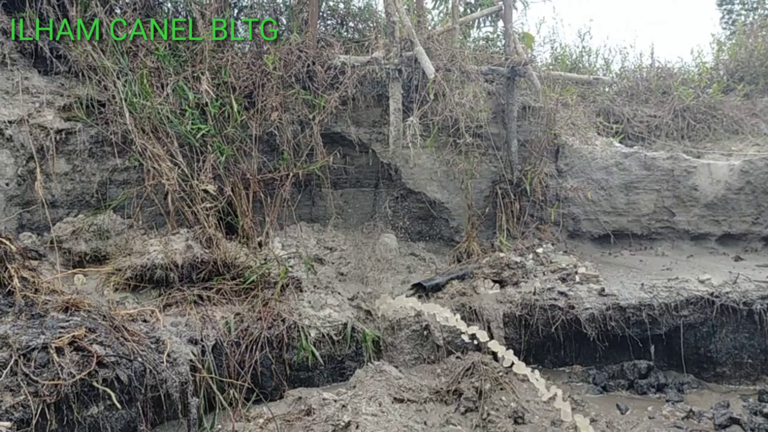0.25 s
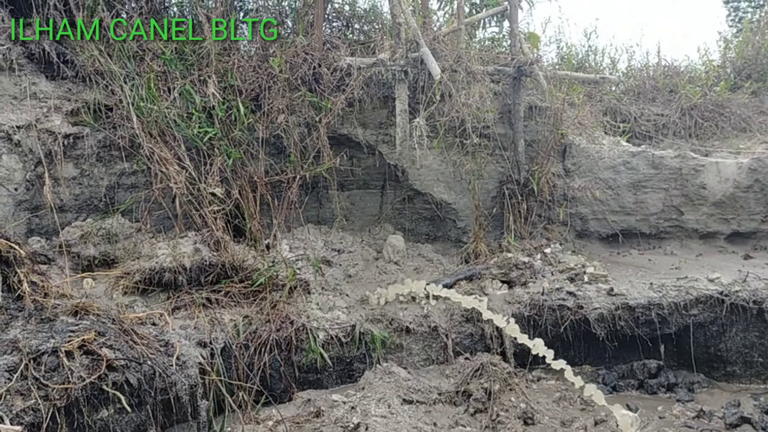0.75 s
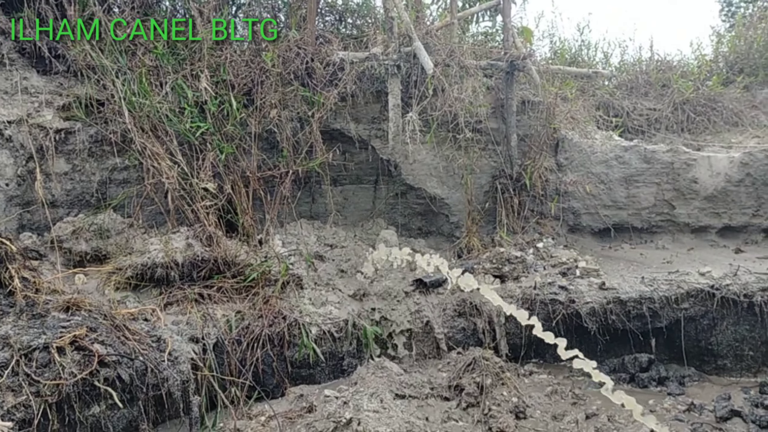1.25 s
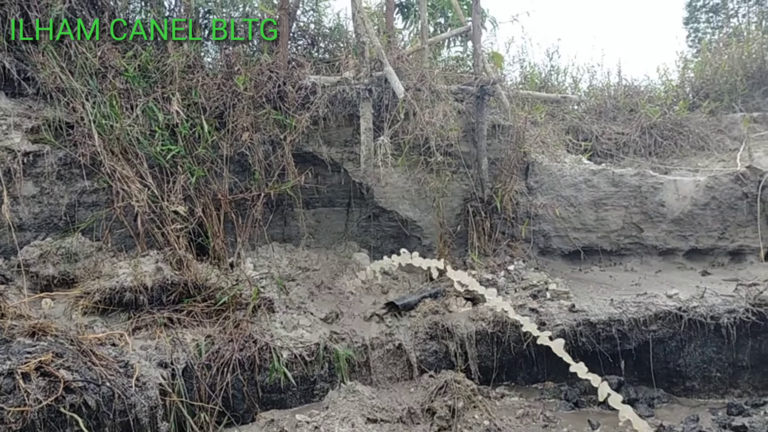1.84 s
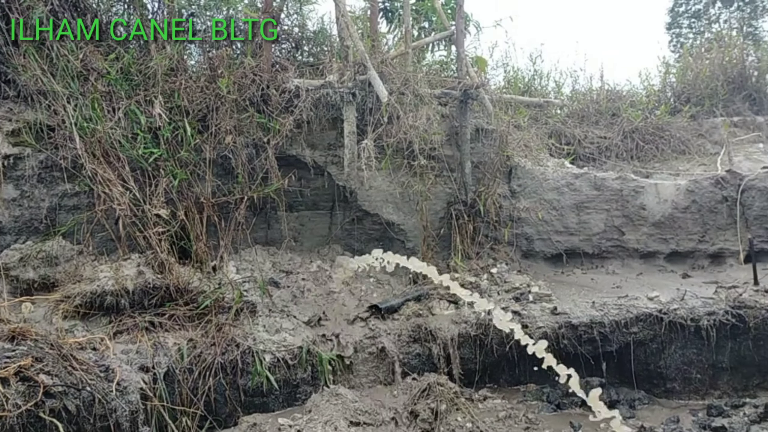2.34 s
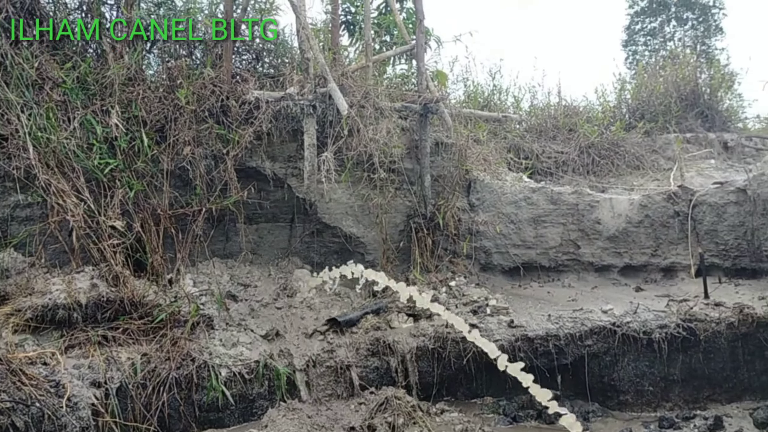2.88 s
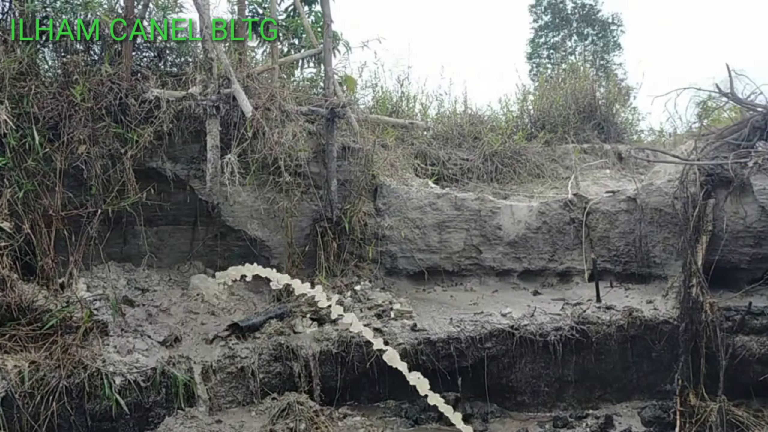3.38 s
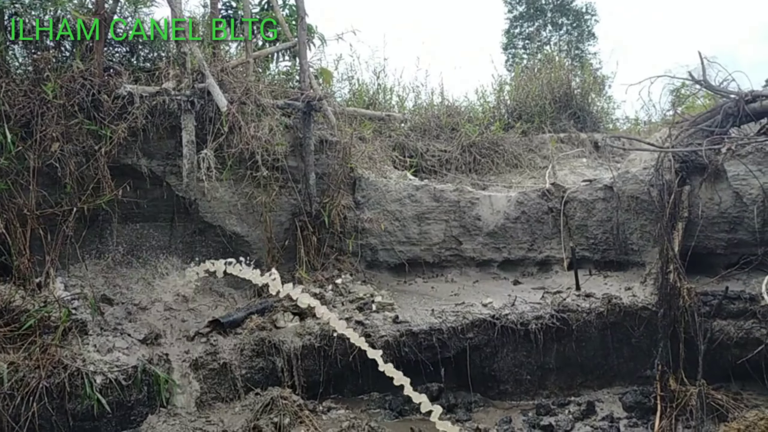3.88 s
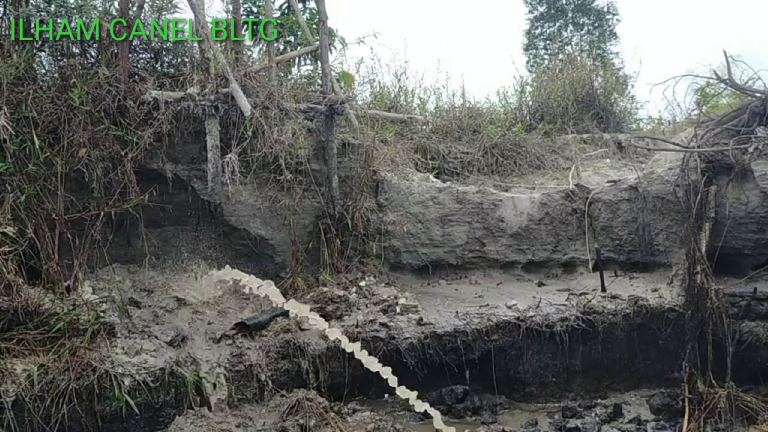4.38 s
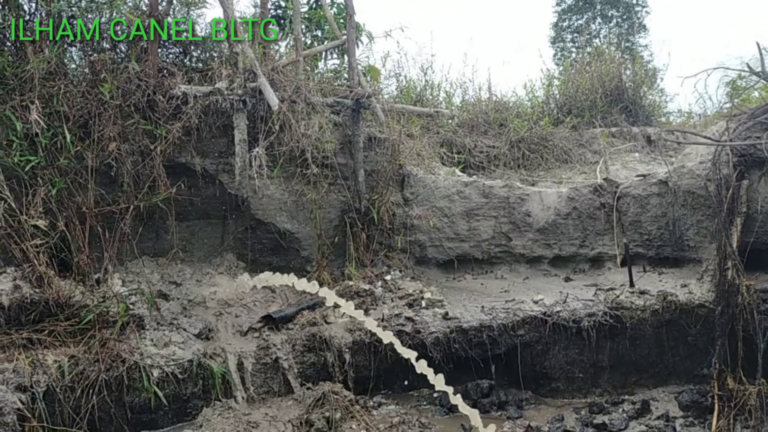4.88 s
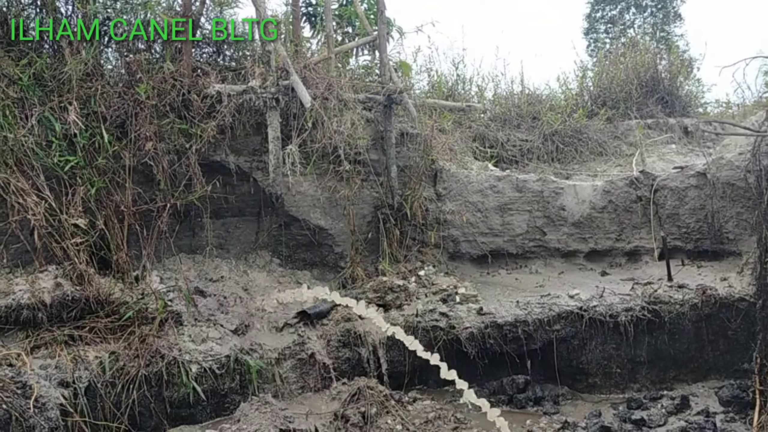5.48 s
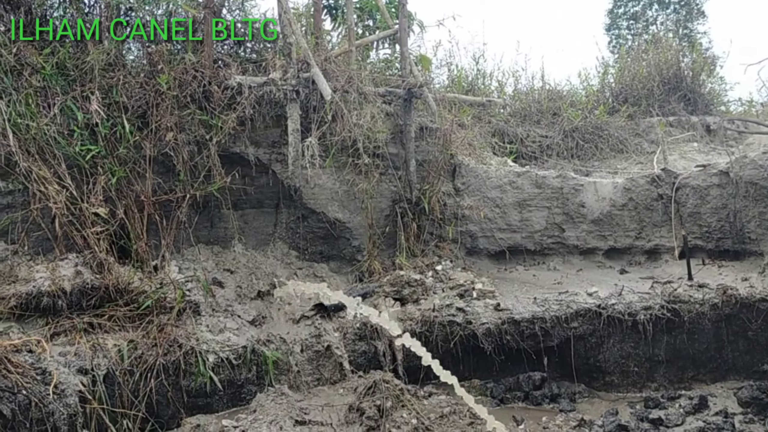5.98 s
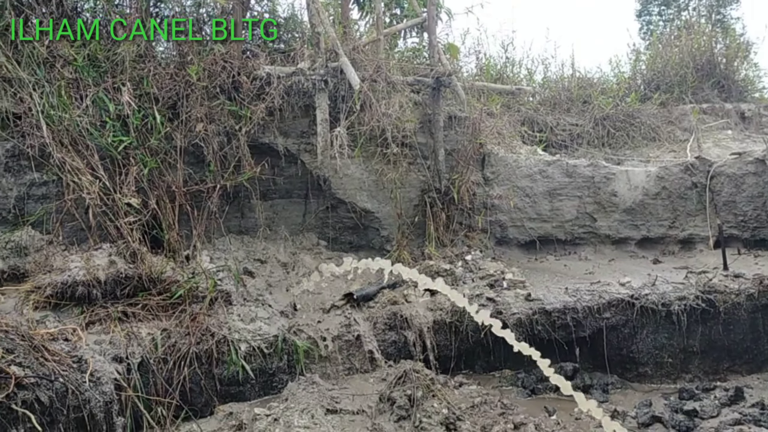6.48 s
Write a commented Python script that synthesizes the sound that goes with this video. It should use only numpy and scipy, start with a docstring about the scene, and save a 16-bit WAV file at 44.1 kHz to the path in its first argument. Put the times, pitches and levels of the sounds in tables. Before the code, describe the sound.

A lumpy jet of sandy slurry pours close by onto wet sand, slapping, gurgling and spattering, while a distant pump engine thuds steadily beneath.

```python
"""A lumpy jet of sandy slurry arcs, close by, from a pipe onto wet sand in an open pit.
The jet is random contacts and damped bubble sines, coloured by resonances of trapped air; slugs slap and plop.
Drops patter, spatter and fizz as filtered clicks; large bubbles gulp on rising sines; low rumbles thump.
Some way off, a pump's slow single-cylinder engine thuds steadily as harmonics of its firing rate and puffs
of noise, over the soft noise of the open air. One microphone, mono."""
import sys
import numpy as np
from scipy import signal
from scipy.fft import rfft, irfft, next_fast_len
from scipy.io import wavfile
from scipy.ndimage import uniform_filter1d

SR = 44100
rng = np.random.default_rng(int(sys.argv[2]) if len(sys.argv) > 2 else 0)


def transcribe(signal):
    """Save signal, clipped to [-1, 1], as a 16-bit WAV file at the path in sys.argv[1]."""
    frames = np.atleast_2d(signal).T
    limited = np.clip(frames, -1, 1)
    pcm = np.round(limited * 32767).astype(np.int16)
    wavfile.write(sys.argv[1], SR, pcm)


N = 296925   # length [samples]


def from_db(db):
    """Decibels to gain."""
    return 10 ** (np.asarray(db) / 20)


def rms_one(x):
    """Scale to unit rms."""
    return x / np.sqrt(np.mean(x ** 2) + 1e-20)


def in_time(rows):
    """The columns of a curve table, one value a sample."""
    s, *columns = np.transpose(rows)
    return [np.interp(np.arange(N) / SR, s, c) for c in columns]


def drift(rate_hz):
    """Slow random wander of rms 1: noise through two equal poles, computed every 40 samples."""
    step = 40
    r = np.exp(-2 * np.pi * rate_hz * step / SR)
    noise = rng.standard_normal(N // step + 2002)
    slow = signal.lfilter([1], [1, -2 * r, r * r], noise)[2000:]   # drop the filter's start
    return np.interp(np.arange(N) / step, np.arange(len(slow)), rms_one(slow))


def surge(depth_db, rate_hz):
    """The uneven delivery of the pipe, as a gain around 1."""
    return from_db(depth_db * drift(rate_hz))


def colour(x, spectrum):
    """Causal (minimum-phase) filter with the given spectrum; rms 1."""
    size = 2 * next_fast_len(N // 2 + SR // 10)
    hz, db = np.transpose(spectrum)
    bins_hz = np.fft.rfftfreq(size, 1 / SR)
    gain = from_db(np.interp(np.log(bins_hz + 1), np.log(hz), db))
    # folding the cepstrum onto positive time makes the phase minimal
    cepstrum = irfft(np.log(gain))[:size // 2]
    cepstrum[1:] *= 2
    response = np.exp(rfft(cepstrum, size))
    return rms_one(irfft(rfft(x, size) * response)[:N])


def skirted(spectrum):
    """Let a spectrum fall away over an octave beyond both ends."""
    (low, low_db), (high, high_db) = spectrum[0], spectrum[-1]
    return [(low / 2, low_db - 32.5), *spectrum, (high * 2, high_db - 30.0)]


def resonate(x, hz, width_hz):
    """One resonance with about unit gain at its top."""
    r = np.exp(-np.pi * width_hz / SR)
    top = np.array([1, 0, -1]) * (1 - r * r) / 2
    return signal.lfilter(top, [1, -2 * r * np.cos(2 * np.pi * hz / SR), r * r], x)


def moving_resonance(x, hz, width_hz):
    """A resonance whose centre follows a curve: shift down, smooth, shift back; rms 1."""
    spin = np.exp(2j * np.pi * np.cumsum(hz) / SR)
    smooth = signal.lfilter([1], [1, -np.exp(-np.pi * width_hz / SR)], x / spin)
    return rms_one((smooth * spin).real)


def band(x, low_hz, high_hz):
    """Keep what lies between two frequencies."""
    return signal.sosfilt(signal.butter(2, [low_hz, high_hz], "band", fs=SR, output="sos"), x)


def impacts(per_s, spread_db):
    """Random clicks of both signs; the rarer ones are larger, or smaller if spread_db is negative."""
    sizes = from_db(spread_db * np.minimum(rng.exponential(1, N), 4))
    return (rng.random(N) < per_s / SR) * sizes * rng.choice([-1, 1], N)


def held(x):
    """Smoothly even out the power over some hundredths of a second, keeping the fast grain."""
    power = uniform_filter1d(uniform_filter1d(x * x, size=SR // 20), size=SR // 20)
    return x / np.sqrt(np.abs(power) + 1e-12)


def lumps(per_s, decay_s, between):
    """The jet breaks into lumps: each lands at once and drains away over a floor of power between them."""
    hits = np.abs(impacts(per_s, spread_db=0.0))
    landings = signal.lfilter([1], [1, -np.exp(-1 / (decay_s * SR))], hits)
    return held(np.sqrt(held(landings) ** 2 + between))


def bubbles(flow, low_hz, high_hz, cycles, rise, spread_db, count):
    """Trapped air: short damped sines, each of its own size, rising in pitch as it nears the surface."""
    when, pitch, size, sign = rng.random((count, 4)).T[:, :, None]
    age = np.arange(int(cycles / low_hz * SR))
    turns = low_hz * (high_hz / low_hz) ** pitch * age / SR
    at = (when * (N - 1)).astype(int)
    strength = flow[at] * from_db(-spread_db * np.log(size + .02)) * np.sign(sign - .5)
    decay = from_db(-60 * turns / cycles)
    rings = strength * decay * np.sin(2 * np.pi * turns * (1 + rise * turns / cycles))
    return rms_one(np.bincount((at + age).ravel(), rings.ravel(), N)[:N])


def rise_and_fade(stage):
    """Rise to 1 at stage 1, then die away more slowly."""
    return stage * np.exp(1 - stage)


CONTACT_RISE_S = 0.000888   # time constant with which a soft burst of contacts builds


def burst_of(t60_s):
    """A short run of wet contacts of uneven size that builds quickly and dies away."""
    age = np.arange(SR // 12) / SR
    envelope = (1 - np.exp(-age / CONTACT_RISE_S)) * from_db(-60 * age / t60_s)
    return rng.laplace(size=len(age)) * envelope


def at_level(x, db):
    """Give a short sound this level: its whole energy counted over 10 ms."""
    return from_db(db) * x / np.sqrt(np.sum(x ** 2) / (.01 * SR))


# open air of the pit: (frequency [Hz], relative density [dB])
AIR_SPECTRUM = [(15, -3.5), (45, 4), (65, -7.5), (120, -0.5), (300, -13), (500, -7.5), (1500, -10),
                (8000, -42.5)]


def open_air():
    """Soft steady noise of the open air all round, coloured by its spectrum."""
    return from_db(-57.0) * colour(rng.standard_normal(N), AIR_SPECTRUM)


# engine speed: (time [s], firing rate [1/s])
FIRING_RATE = [(0, 18.8), (1.9, 19.0), (4.2, 18.88), (5.5, 18.8), (6.73, 18.82)]
# exhaust note: (multiple of the firing rate, relative level [dB])
EXHAUST_HARMONICS = [(1, -22), (4, -16.5), (5, -0.5), (6, -12), (7, -13), (8, -7), (9, -22), (11, -9),
                     (12, -17), (14, -19), (16, -16.5), (19, -22)]
# rush of the exhaust puffs: (time [s], level [dB])
PUFF_LEVEL = [(0, -57), (2.3, -59), (4.5, -54.5), (6.73, -56.5)]
# colour of that rush: (frequency [Hz], relative density [dB])
PUFF_SPECTRUM = [(60, -21.5), (110, -5.5), (140, -10.5), (170, -2.5), (250, -4.5), (400, -7), (600, -14),
                 (1200, -19)]


def engine(note_db, waver_db, puff_decay):
    """Some way off, each firing drives the exhaust pipe's note and lets out a short rush of gas."""
    firing_rate, = in_time(FIRING_RATE)
    puff_db, = in_time(PUFF_LEVEL)
    cycle = np.cumsum(firing_rate) / SR
    note = np.zeros(N)
    for multiple, db in EXHAUST_HARMONICS:
        phase = 2 * np.pi * round(multiple) * cycle + rng.uniform(0, 2 * np.pi)
        note += from_db(db + waver_db * drift(1.6)) * np.sin(phase)
    rush = np.exp(-puff_decay * (cycle % 1)) + 0.25   # decays within each cycle, never quite stops
    puffs = colour(rng.standard_normal(N) * rush, skirted(PUFF_SPECTRUM))
    return from_db(note_db) * rms_one(note) + from_db(puff_db) * puffs


# dull, low thumps under the splashing: (time [s], centre [Hz], level at the peak [dB])
LOW_THUMPS = [(0.259, 226, -55.5), (0.572, 113, -51), (1.131, 177, -52)]
THUMP_RISE_S = 0.025   # time to the peak


def thumps(width_hz):
    """Each thump is a soft swell of narrow, low rumble."""
    out, age = np.zeros(N + SR), np.arange(SR // 3) / SR
    for s, hz, db in LOW_THUMPS:
        noise = rng.standard_normal(len(age))
        rumble = rms_one(resonate(resonate(noise, hz, width_hz), hz, width_hz))
        out[round(s * SR) + np.arange(len(age))] += from_db(db) * rise_and_fade(age / THUMP_RISE_S) * rumble
    return out[:N]


# patches of froth, each on one pitch: (middle time [s], pitch [Hz], level at the middle [dB])
FROTH_PATCHES = [(.6, 4900, -49), (.7, 3890, -50), (0.899, 2866, -42), (1.65, 5560, -52.5),
                 (4.4, 5030, -51.5), (4.65, 2700, -43), (5.6, 5500, -53.5), (6.05, 3770, -50)]


def fizzes(width_hz, length_s):
    """A patch of froth bursts in tiny bubbles of like size: it crackles around one pitch, swells and fades."""
    t = np.arange(N) / SR
    out = np.zeros(N)
    for s, hz, db in FROTH_PATCHES:
        clicks = impacts(per_s=500, spread_db=2) + 1e-18
        crackle = rms_one(resonate(resonate(clicks, hz, width_hz), hz, width_hz))
        out += from_db(db) * np.exp(-((t - s) / length_s) ** 2) * crackle
    return out


# large bubbles from the pool: (time [s], starting pitch [Hz], peak level before trim [dB], time to the peak [s])
LARGE_BUBBLES = [(.305, 920, -31.5, 0.0026), (.699, 953, -34.5, 0.0042), (.765, 886, -36, 0.0045),
                 (0.984, 958, -37, .007), (1.008, 2810, -35, 0.004), (1.198, 970, -35.5, 0.0067),
                 (2.295, 1056, -36, 0.0042), (6.088, 801, -39.5, 0.0092), (6.097, 1143, -42, 0.0063),
                 (6.105, 960, -44, 0.01)]
GULP_RISE = 0.018   # share by which the pitch rises on the way to the peak


def gulps(trim_db, rough_rad):
    """A large bubble swells and dies away on a rising pitch, its phase wobbling by chance."""
    out, age = np.zeros(N + SR), np.arange(SR // 12) / SR
    wobble = drift(60)
    for s, hz, db, rise_s in LARGE_BUBBLES:
        span, stage = round(s * SR) + np.arange(len(age)), age / rise_s
        phase = 2 * np.pi * np.cumsum(hz * (1 + GULP_RISE * stage)) / SR + rough_rad * wobble[span]
        out[span] += from_db(db + trim_db) * rise_and_fade(stage) * np.sin(phase)
    return out[:N]


# drops smacking down together: (time [s], centre [Hz], level over 10 ms before trim and top cut [dB])
DROP_HANDFULS = [(0.3, 5160, -48), (0.86, 5100, -47), (1.337, 4870, -43), (1.989, 4100, -41),
                 (2.192, 4050, -47), (2.634, 5200, -44.5), (3.235, 5200, -44.5), (3.38, 5250, -43.5),
                 (4.317, 4500, -40), (4.415, 5570, -43), (4.519, 5300, -43), (4.707, 6700, -42.5),
                 (6.174, 4320, -43.5), (6.348, 4800, -44.5)]
SPATTER_T60_S = 0.053   # a handful thins out by 60 dB in this time


def spatters(spread, trim_db):
    """A handful of drops smacks the sand within a few hundredths of a second, as sparse contacts in a band."""
    out, ratio = np.zeros(N + SR), 1 + spread
    for s, hz, db in DROP_HANDFULS:
        burst = burst_of(SPATTER_T60_S)
        drops = burst * (rng.random(len(burst)) < 3000 / SR)   # some 3000 contacts a second
        smack = at_level(band(drops, hz / ratio, hz * ratio), db + trim_db)
        out[round(s * SR) + np.arange(len(burst))] += smack
    return signal.sosfilt(signal.butter(10, 7700, fs=SR, output="sos"), out[:N])


# showers thrown up by the jet, negative where the drops thin out:
# (start [s], peak change of the coarse drops [dB], peak change of the mist [dB])
SHOWER_CHANGES = [(0.271, 6.5, 7.5), (.85, 0, 5.5), (1.49, 4, 2), (1.72, 2.5, 1), (1.98, -2, 5),
                  (2.64, 3.5, 4), (3.22, -1, 4), (3.69, 3, 3.5), (4.315, 3.5, 0), (4.69, 1, 0),
                  (6.34, 0, 2)]
SHOWER_RISE_S = 0.019   # the change peaks this long after the shower starts, then fades


def shower_changes():
    """Each shower quickly swells or thins the coarse drops and swells the mist, then fades; both in dB."""
    s, *changes_db = np.transpose(SHOWER_CHANGES)
    age = np.maximum(np.arange(N) / SR - s[:, None], 0)
    return np.array(changes_db) @ rise_and_fade(age / SHOWER_RISE_S)


# drops thrown clear, before the showers: (time [s], spray level [dB], fine mist level [dB])
SPRAY_AND_MIST_LEVEL = [(0, -47.5, -55), (.55, -42, -49), (1.1, -44.5, -53), (1.9, -44.5, -52),
                        (2.5, -47, -53), (3.55, -46, -49.5), (4.15, -45.5, -47.5), (4.85, -47, -50),
                        (5.4, -44, -49), (6, -45.5, -52), (6.73, -46.5, -53.5)]
# colours of the coarse and the fine drops: (frequency [Hz], relative density [dB])
SPRAY_SPECTRUM = [(2600, -3), (3500, 0.5), (3900, -0.5), (4300, -3), (4800, -0.5), (5250, -2), (5600, -0.6),
                  (5950, -8.5), (6700, -32)]
MIST_SPECTRUM = [(5400, -15.5), (6200, 1), (6600, 5), (6950, 4), (7450, 7.5), (7850, 3.5), (8400, -22.5)]


def droplets(flow, coarse_db, fine_db):
    """Small drops thrown up by each lump patter down in little showers and fizz on the wet sand."""
    spray_db, mist_db = np.add(in_time(SPRAY_AND_MIST_LEVEL), [coarse_db, fine_db])
    showers = flow * lumps(per_s=59, decay_s=0.00052, between=5.4)
    patter = rms_one(showers * impacts(per_s=9000, spread_db=-1.5))
    patter += 0.25 * bubbles(showers, low_hz=3320, high_hz=8180, cycles=110, rise=0.011,
                             spread_db=2.8, count=6000)
    patter += 0.21 * rms_one(impacts(per_s=80, spread_db=-2.0))   # a few drops tick on their own
    spray = from_db(spray_db) * held(colour(patter, skirted(SPRAY_SPECTRUM)))
    mist = from_db(mist_db) * held(colour(patter, skirted(MIST_SPECTRUM)))
    return spray + mist * surge(depth_db=1.0, rate_hz=14)


# heavy slugs hitting the wet ground, levels over 10 ms before trims:
# (time [s], pitch of the trapped air [Hz], its ring [dB], deep plop [dB], splash [dB])
HEAVY_SLUGS = [(0.136, 1580, -33, -56, -44), (0.268, 1530, -30, -47, -44), (0.511, 1810, -37, -39, -38),
               (0.602, 1620, -32, -33.5, -31), (0.727, 1690, -34, -38, -37), (0.804, 1850, -36, -49, -28),
               (1.014, 1500, -30.5, -38.5, -36), (1.128, 1540, -35, -40, -29.5),
               (1.176, 1490, -32, -36.5, -41), (1.498, 1490, -31.5, -46, -45),
               (1.654, 1680, -38, -36.5, -46), (1.729, 1580, -31, -37, -42), (1.756, 1650, -36, -39, -39),
               (1.987, 1550, -31, -44, -40), (2.381, 1490, -35, -42, -36), (3.102, 1600, -37, -54, -36),
               (3.239, 1600, -33.5, -40, -47), (3.418, 1550, -30.5, -36, -50),
               (3.584, 1650, -35, -32, -43.0), (3.648, 1570, -26.5, -35.5, -39),
               (3.731, 1770, -27, -37, -50), (3.844, 1730, -28.5, -39, -38), (4.187, 1640, -34.5, -45, -38),
               (4.275, 1670, -36, -51, -40), (4.315, 1620, -31.5, -35.5, -38),
               (4.644, 1650, -34.5, -46, -38.5), (5.131, 1620, -26, -40, -34),
               (5.257, 1650, -33.5, -38, -44), (5.279, 1700, -30.5, -45, -35),
               (5.974, 1700, -35.5, -38, -50), (6.034, 1910, -36.5, -44, -38),
               (6.069, 1630, -28.5, -31, -47), (6.202, 1800, -30.5, -42, -33),
               (6.224, 1670, -34, -32.5, -38), (6.35, 2000, -31, -52, -35.5), (6.45, 1780, -28.5, -45, -39),
               (6.548, 1840, -29.5, -49, -44)]
SLUG_T60_S = 0.052   # every slug drains away by 60 dB in this time
SLAP = .45   # one flat contact early in the slug, against the run of contacts around it


def slugs(pocket_width_hz, ring_trim_db, plop_trim_db, splash_trim_db):
    """A heavy slug claps a pocket of air shut, plops into the pool and splashes off the sand."""
    out = np.zeros(N + SR)
    for s, hz, ring_db, plop_db, splash_db in HEAVY_SLUGS:
        burst = burst_of(SLUG_T60_S)
        clap = burst.copy()
        clap[round(2 * CONTACT_RISE_S * SR)] += SLAP * np.linalg.norm(burst)
        pocket = resonate(clap, hz, pocket_width_hz)
        ring = at_level(band(pocket, low_hz=1386, high_hz=2060), ring_db + ring_trim_db)
        plop = at_level(band(clap, low_hz=850, high_hz=1270), plop_db + plop_trim_db)
        splash = at_level(band(burst, low_hz=2170, high_hz=2920), splash_db + splash_trim_db)
        out[round(s * SR) + np.arange(len(burst))] += ring - plop - splash
    return out[:N]


# two main air pockets under the jet: (time [s], big pocket [Hz], small pocket before its wander [Hz])
POCKET_PITCHES = [(0, 895, 1495), (1.2, 953, 1562), (1.7, 1097, 1566), (2.5, 1180, 1484), (4.3, 1164, 1713),
                  (5.6, 1150, 1634), (6.1, 913, 1635), (6.35, 934, 1955), (6.73, 1070, 1800)]
# slosh, as the jet enters and leaves its hollow, before trim: (time [s], level [dB])
SLOSH_SWING = [(0, -38.5), (.12, -35.5), (.48, -43.5), (.6, -36), (1.2, -38), (1.33, -37), (2.05, -40),
               (2.2, -36.5), (3.72, -38), (3.9, -45.5), (4.06, -41), (4.22, -37), (4.47, -42),
               (4.67, -36.5), (5.05, -37.5), (5.28, -37), (5.68, -40), (5.77, -38), (6.73, -37)]
# deep plops at an average slosh, before trim: (time [s], level [dB])
PLOP_SWING = [(0, -45.5), (.55, -47.5), (.8, -41.5), (1.2, -43), (1.4, -44), (1.94, -48.5), (2.33, -41),
              (2.7, -44.5), (3.5, -43.5), (4.1, -46.5), (5.08, -46.5), (5.28, -42.5), (5.82, -48),
              (6.1, -42.5), (6.3, -52), (6.73, -42)]
# splatter off the sand, before trim and showers: (time [s], level [dB])
SPLATTER_SWING = [(0, -37), (.48, -37), (.64, -33.5), (.82, -34), (1, -39), (1.17, -36.5), (1.4, -38),
                  (2, -37.5), (2.5, -39.5), (3.6, -38.5), (3.95, -39.5), (4.6, -37.5), (4.8, -38.5),
                  (5.6, -37), (6.45, -38.5), (6.73, -39)]
# colours of the landing jet: (frequency [Hz], relative density [dB])
PLOP_SPECTRUM = [(300, -30.5), (520, -17), (680, -7), (800, -5), (940, -0.5), (1150, 1), (1300, -6.5),
                 (1700, -18)]
SLOSH_SPECTRUM = [(900, -23), (1250, -10), (1430, -4.5), (1590, -0.5), (1720, -5.5), (1880, -3.5),
                  (2080, -11.5), (2700, -23.5)]
SPLATTER_SPECTRUM = [(1400, -26.5), (1850, -5), (2100, -4), (2500, -4), (2720, -4.5), (2860, -4.5),
                     (3200, -7), (3600, -19), (5000, -28)]
PLOPS_FOLLOW = 0.44   # share of the slosh's swing in dB that the plops take on
SPLATTER_FOLLOWS = 0.27   # power of the flow: how closely the splatter keeps step with the lumps
POCKET_WANDER = 0.015   # share by which the small pocket's pitch wanders by chance


def plops_of(flow, big_hz):
    """The big pocket gulps among loose bubbles and contacts."""
    colours = skirted(PLOP_SPECTRUM)
    plops = bubbles(flow, low_hz=664.0, high_hz=1435, cycles=49, rise=0.041, spread_db=5.0, count=2000)
    plops += 6.8 * rms_one(flow * impacts(per_s=3300, spread_db=7.5))
    drive = colour(flow * impacts(per_s=1300, spread_db=-0.5), colours)
    return colour(plops, colours) + 0.53 * moving_resonance(drive, big_hz, width_hz=98)


def slosh_of(flow, small_hz):
    """The small pocket rings in fits among bubbles and contacts, its level surging."""
    colours = skirted(SLOSH_SPECTRUM)
    slosh = bubbles(flow, low_hz=1239, high_hz=2146, cycles=98, rise=0.0079, spread_db=0.5, count=1800)
    slosh += 3.2 * rms_one(flow * impacts(per_s=5800, spread_db=3.5))
    drive = colour(flow * impacts(per_s=2800, spread_db=2.5), colours)
    pocket = moving_resonance(drive, small_hz * (1 + POCKET_WANDER * drift(5)), width_hz=175)
    return colour(slosh, colours) + 1.25 * rms_one(pocket * surge(depth_db=2.2, rate_hz=28))


def splatter_of(flow):
    """Splatter off the sand is mostly bare wet contacts, with some bubbles."""
    splatter = bubbles(flow, low_hz=1801, high_hz=3400, cycles=75, rise=0.025, spread_db=2.6, count=1500)
    splatter += 3.9 * rms_one(flow ** SPLATTER_FOLLOWS * impacts(per_s=7000, spread_db=1.4))
    return colour(splatter, skirted(SPLATTER_SPECTRUM))


def pour(flow, shower_db, plop_trim_db, slosh_trim_db, splatter_trim_db):
    """Close by, lumps of the jet trap air in big and small pockets and throw splatter."""
    (slosh_db,), (plop_db,), (splatter_db,) = map(in_time, (SLOSH_SWING, PLOP_SWING, SPLATTER_SWING))
    plop_db = plop_db + PLOPS_FOLLOW * (slosh_db - slosh_db.mean())
    big_hz, small_hz = in_time(POCKET_PITCHES)
    hollow = from_db(plop_db + plop_trim_db) * held(plops_of(flow, big_hz))
    hollow += from_db(slosh_db + slosh_trim_db) * held(slosh_of(flow, small_hz))
    splatter = from_db(splatter_db + shower_db + splatter_trim_db) * held(splatter_of(flow))
    return hollow * surge(depth_db=1.0, rate_hz=13) + splatter


def banks(x, echo_db, count):
    """Faint, dull echoes from the sandy banks of the pit, 8 to 45 ms late."""
    lags = (rng.uniform(.008, .045, count) * SR).astype(int)
    echoes = sum(np.pad(x, (lag, 0))[:N] for lag in lags) / np.sqrt(count)
    return x + from_db(echo_db) * signal.lfilter(*signal.butter(1, 3500, fs=SR), echoes)


def scene():
    """The surging jet lands between the banks, over the distant pump engine and the open air."""
    pump = engine(note_db=-48.5, waver_db=0.5, puff_decay=2.2)
    flow = lumps(per_s=170, decay_s=.003, between=.8)
    coarse_db, fine_db = shower_changes()
    wet = pour(flow, coarse_db, plop_trim_db=-0.68, slosh_trim_db=-1.0, splatter_trim_db=-0.5)
    wet += droplets(flow ** 0.64, coarse_db, fine_db)   # drops keep step with the lumps less closely
    wet = wet * surge(depth_db=.6, rate_hz=6)
    wet += slugs(pocket_width_hz=380, ring_trim_db=-.8, plop_trim_db=-1.2, splash_trim_db=-1.5)
    wet += spatters(spread=0.16, trim_db=2.5) + fizzes(width_hz=260, length_s=0.28)
    wet += gulps(trim_db=4.5, rough_rad=0.94) + thumps(width_hz=65)
    return (banks(wet, echo_db=-9.5, count=5) + pump + open_air())[None]


CUTOFF_HZ = 8450


def record(dry):
    """One microphone channel, its top cut steeply by an elliptic low-pass."""
    return signal.sosfilt(signal.ellip(10, .2, 80, CUTOFF_HZ, fs=SR, output="sos"), dry)


dry = scene()
out = record(dry)
transcribe(out)
```